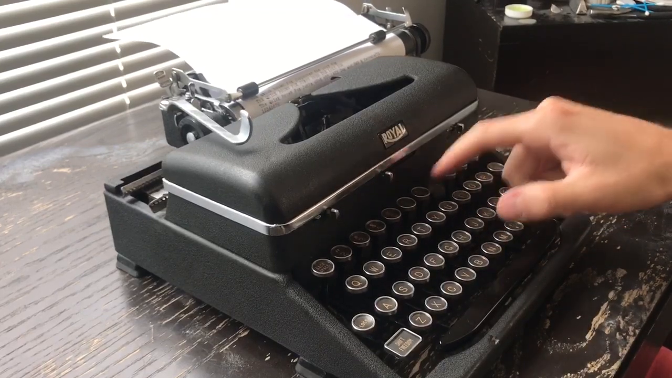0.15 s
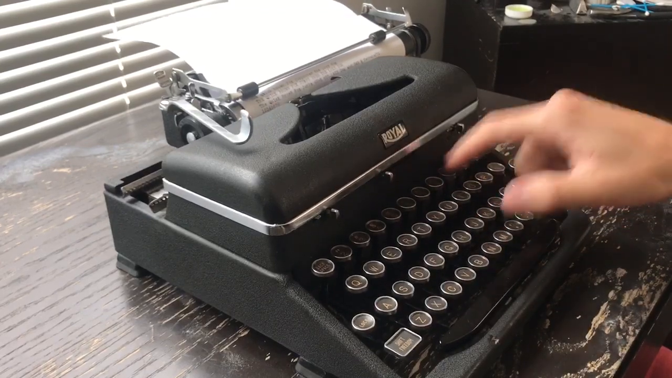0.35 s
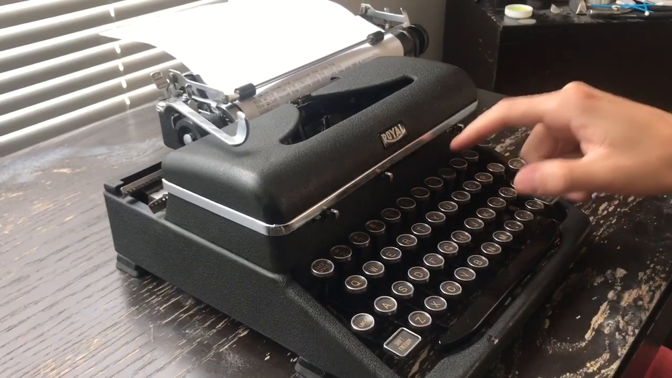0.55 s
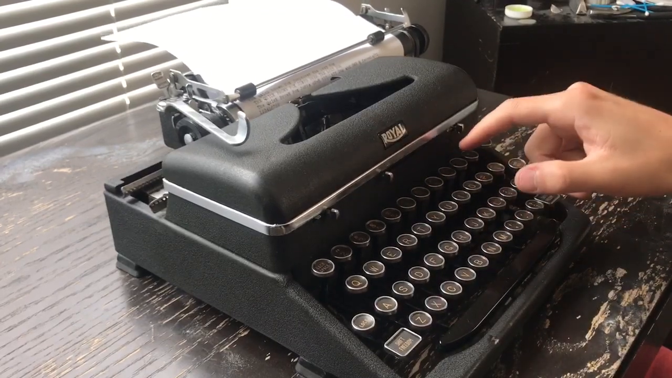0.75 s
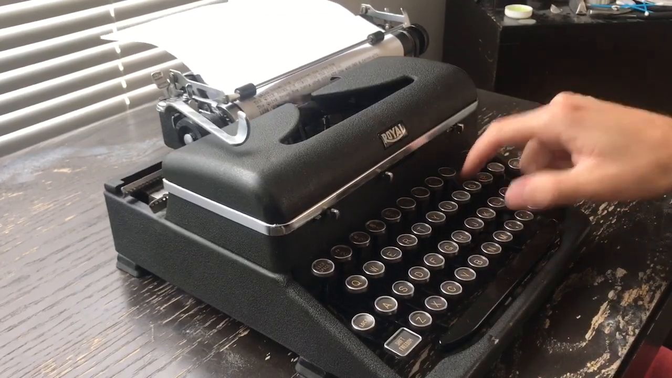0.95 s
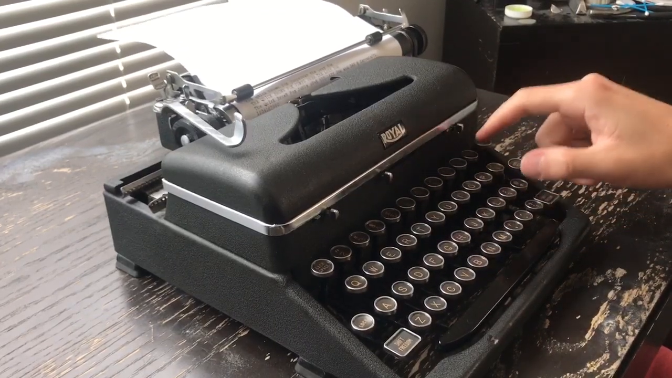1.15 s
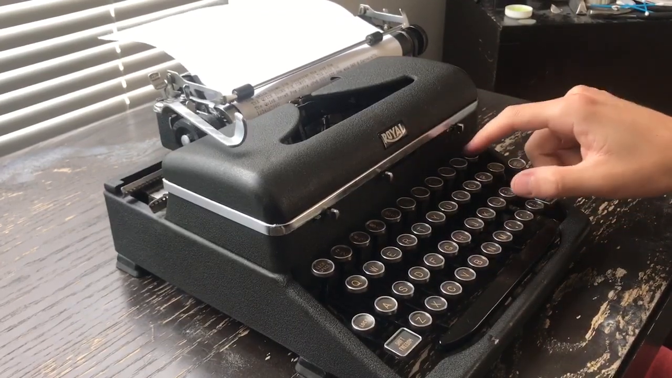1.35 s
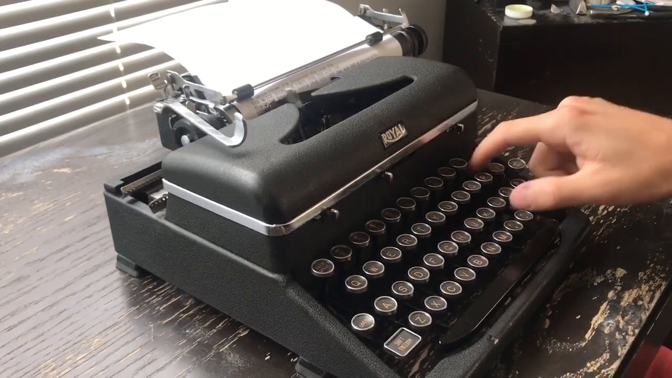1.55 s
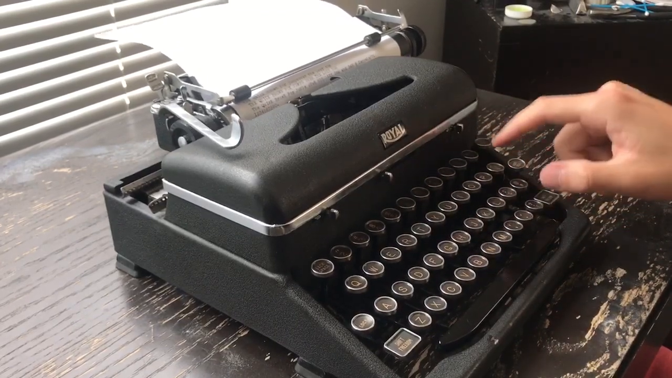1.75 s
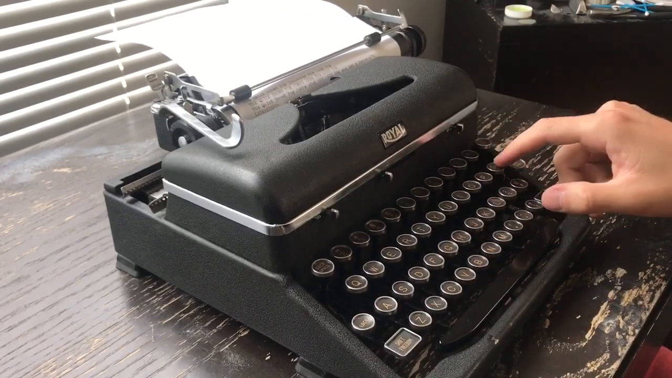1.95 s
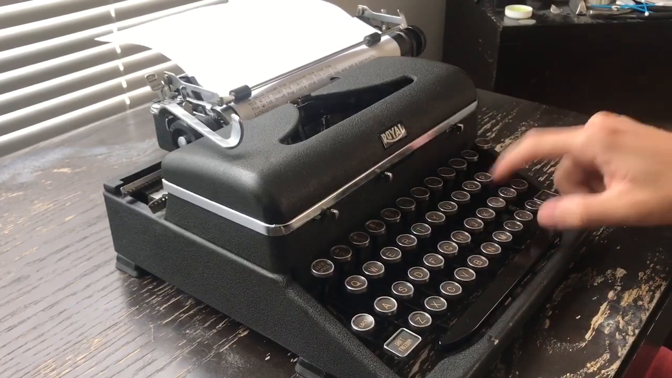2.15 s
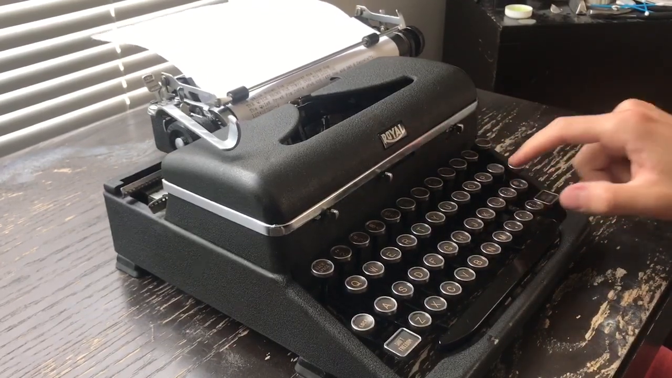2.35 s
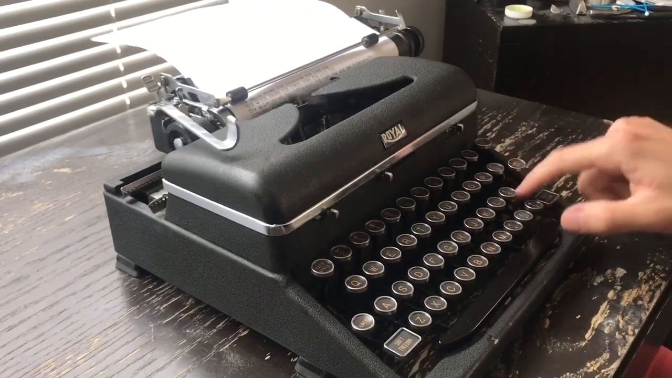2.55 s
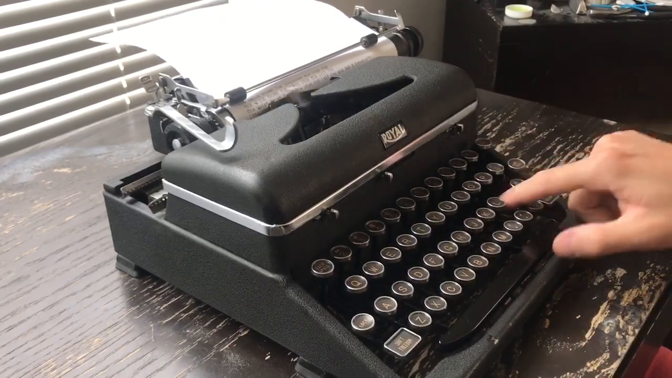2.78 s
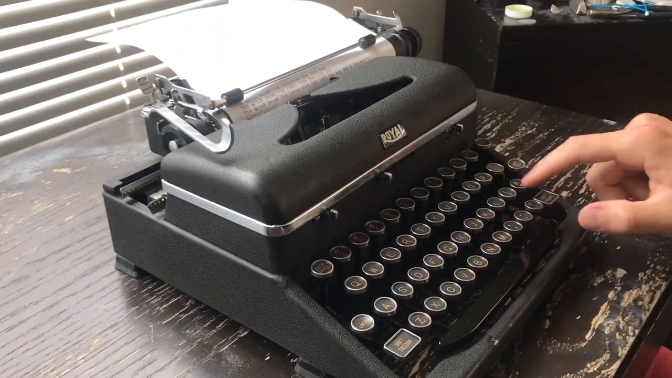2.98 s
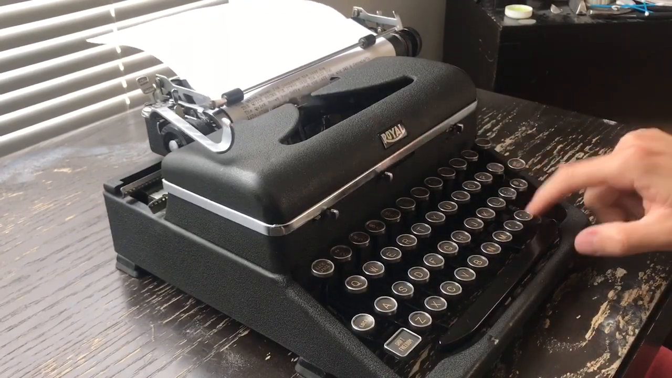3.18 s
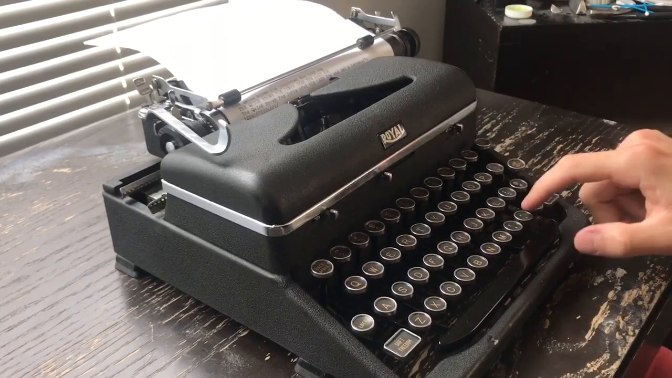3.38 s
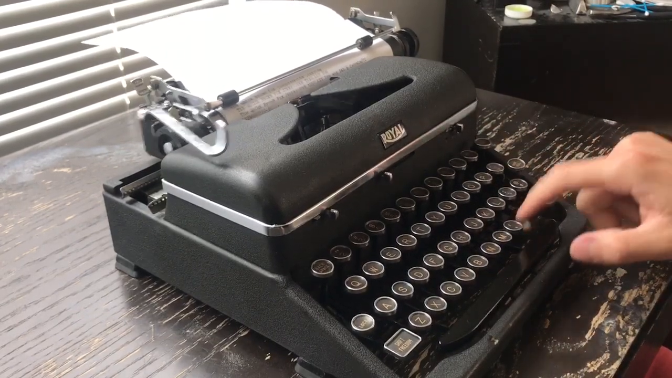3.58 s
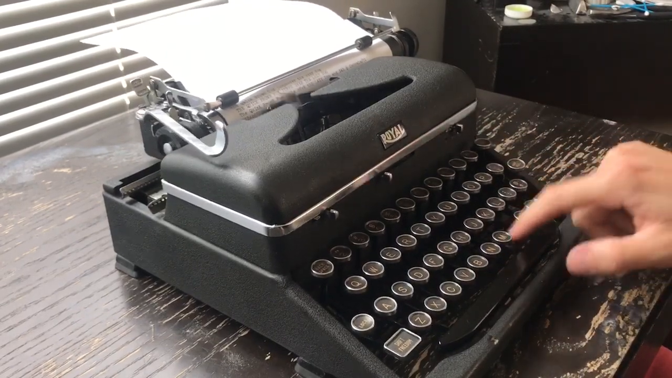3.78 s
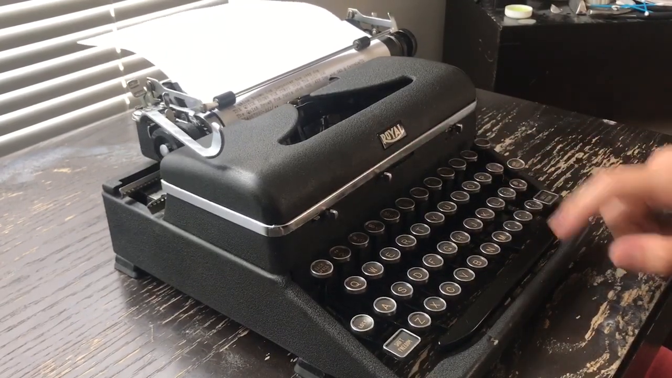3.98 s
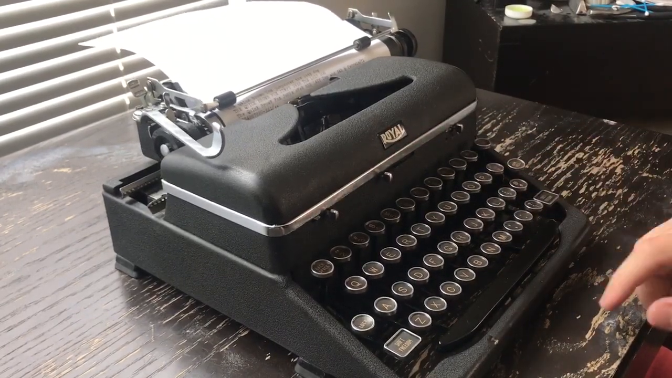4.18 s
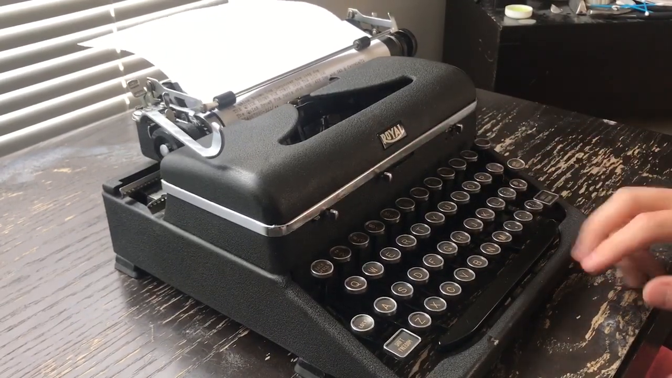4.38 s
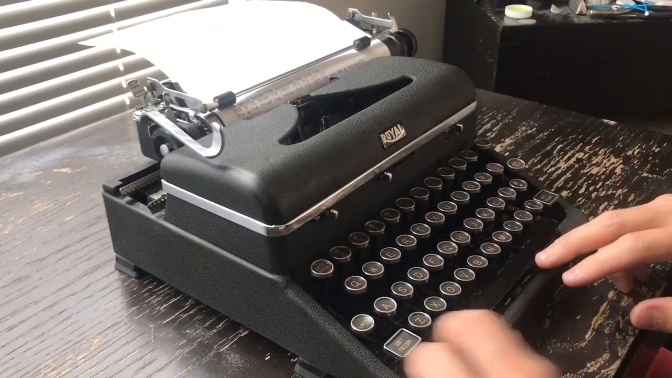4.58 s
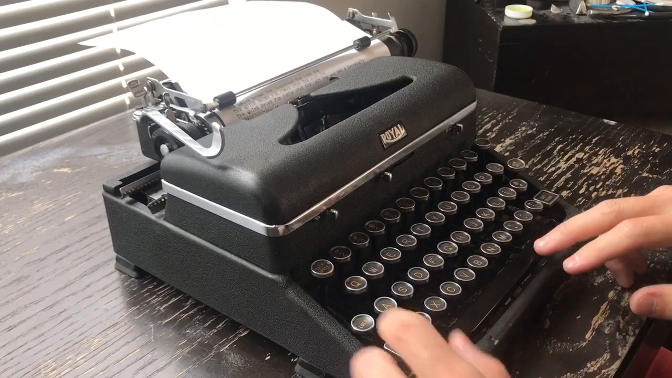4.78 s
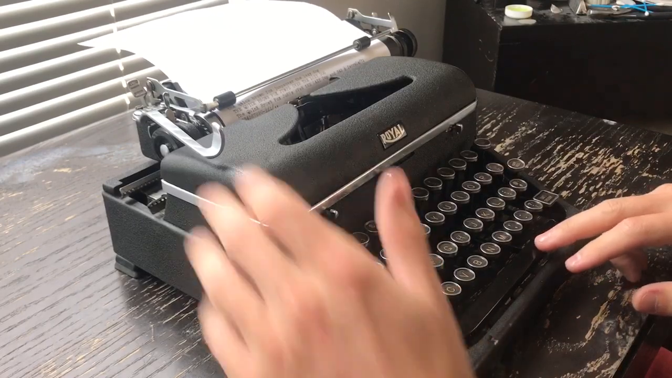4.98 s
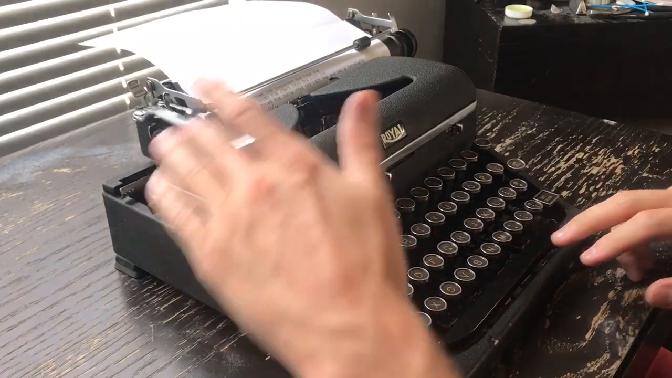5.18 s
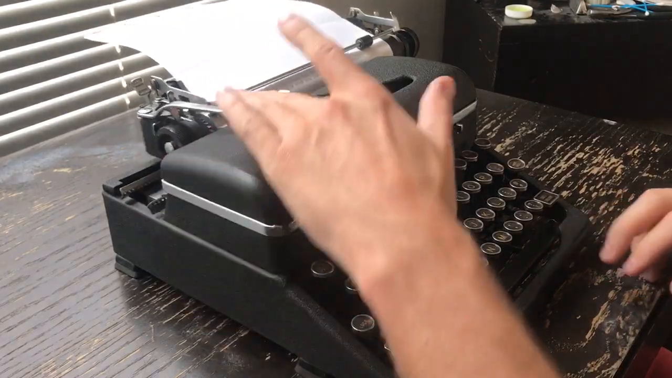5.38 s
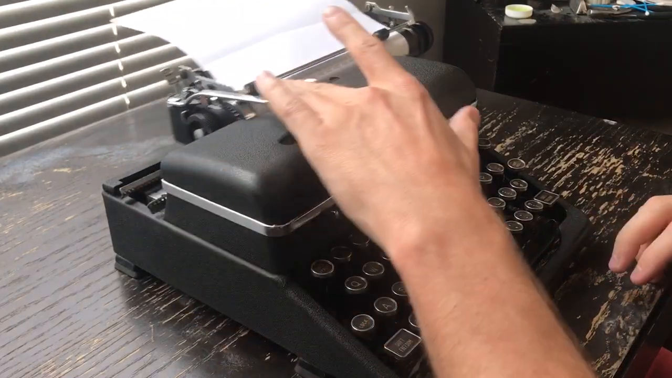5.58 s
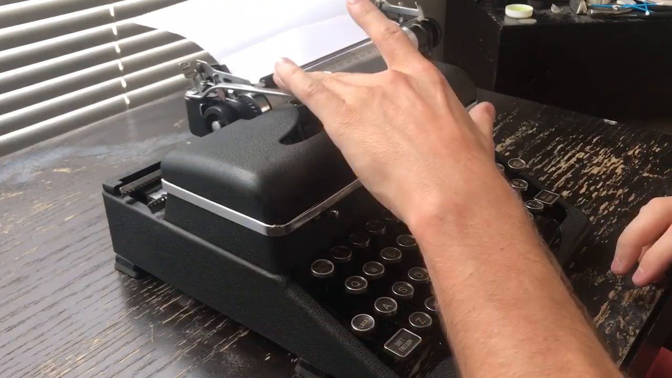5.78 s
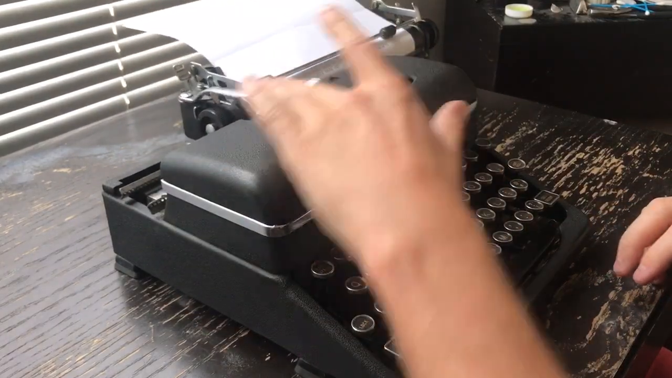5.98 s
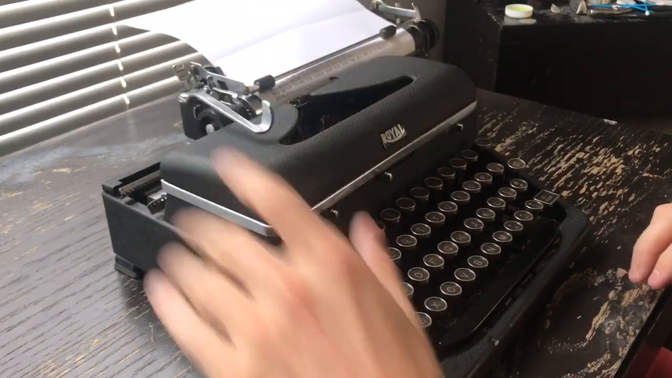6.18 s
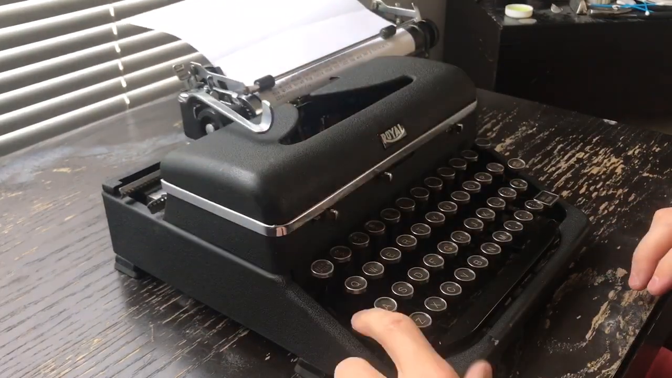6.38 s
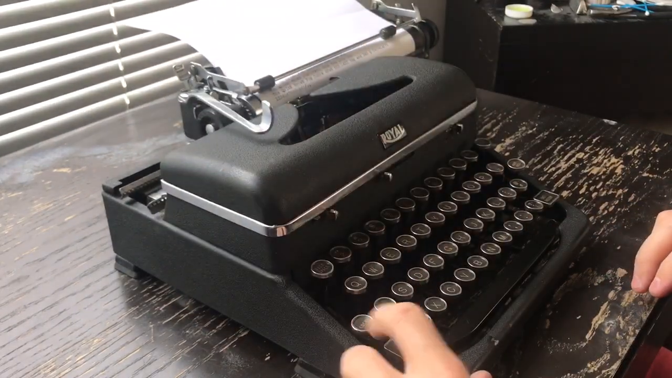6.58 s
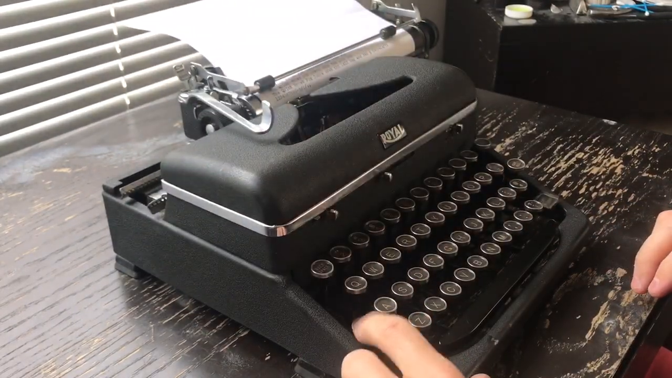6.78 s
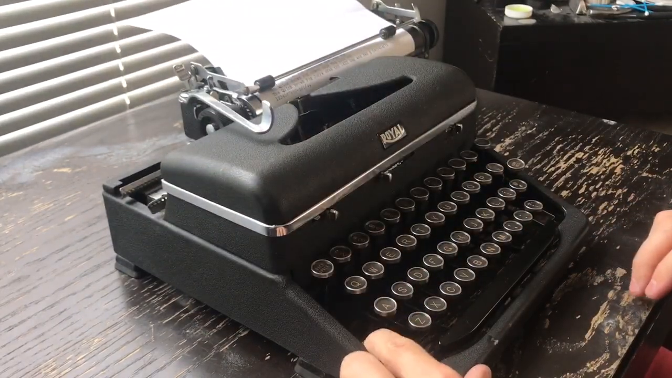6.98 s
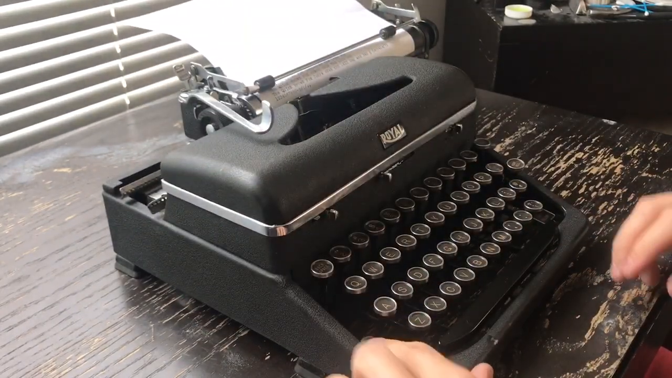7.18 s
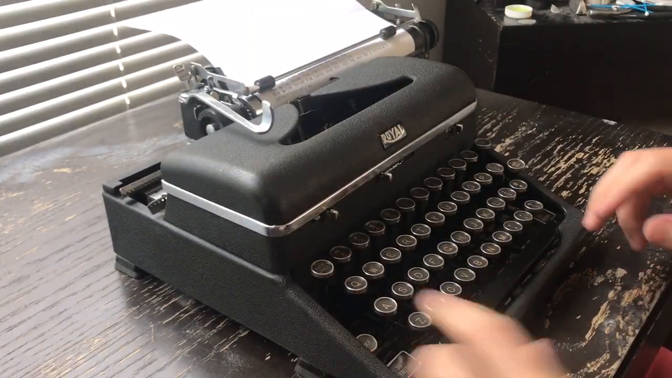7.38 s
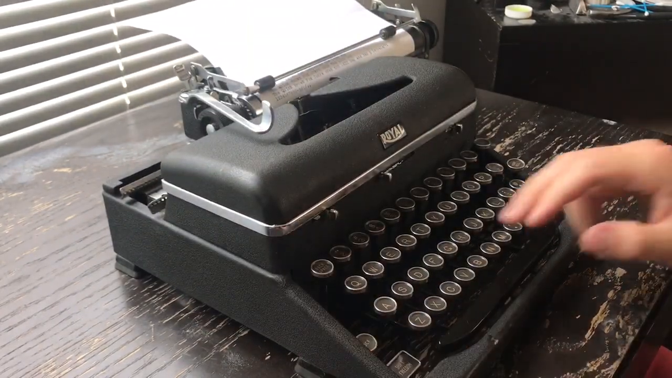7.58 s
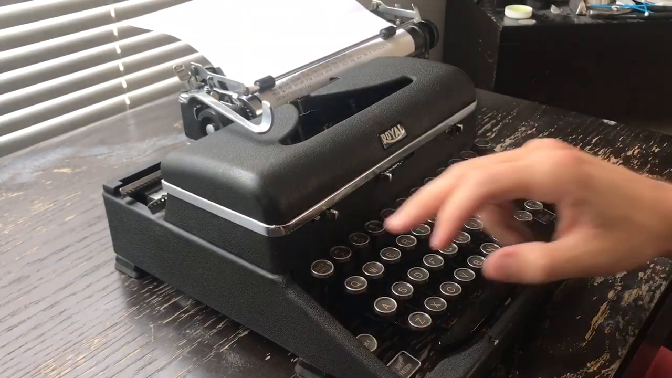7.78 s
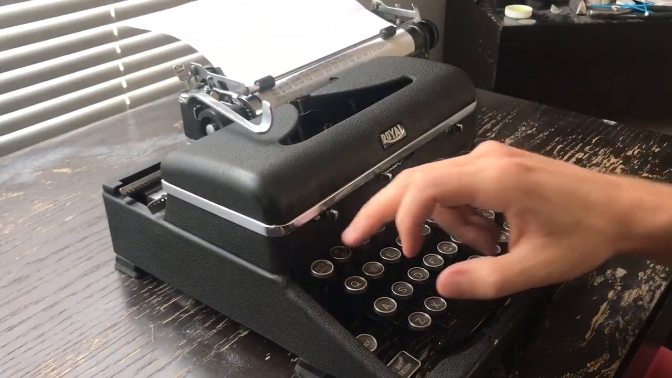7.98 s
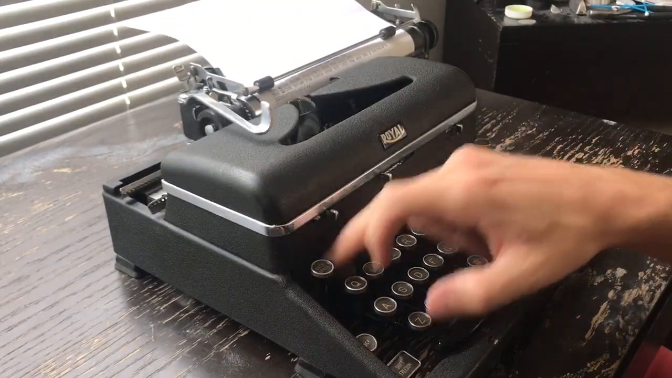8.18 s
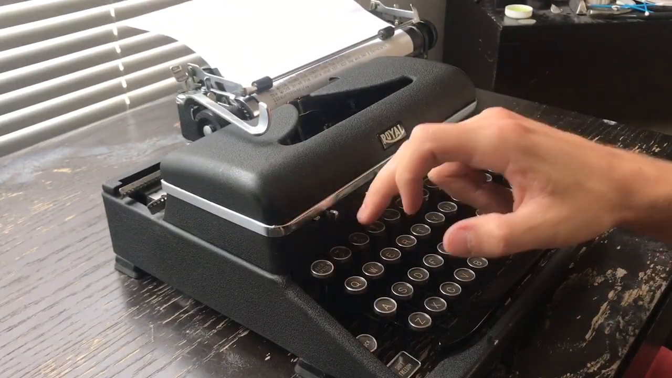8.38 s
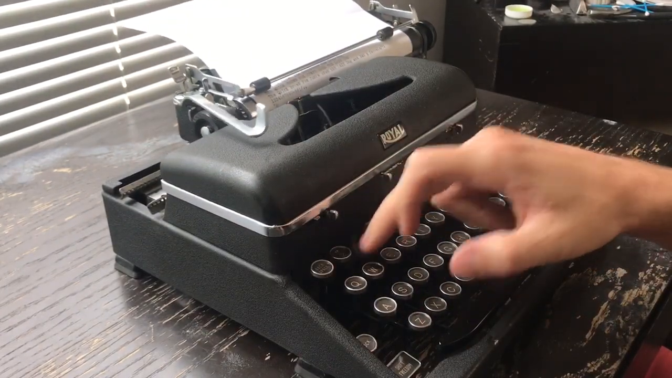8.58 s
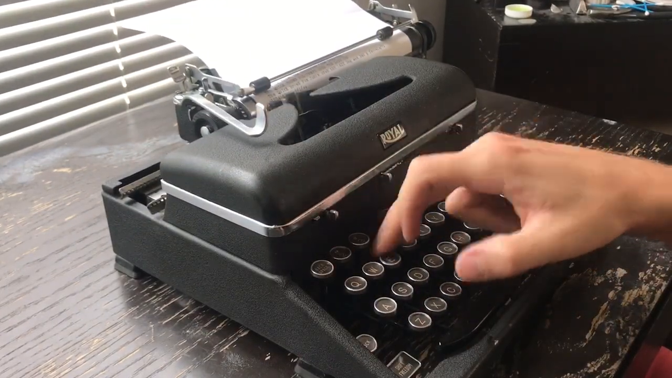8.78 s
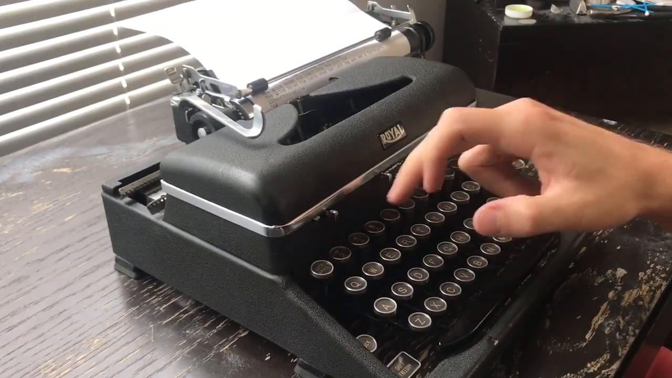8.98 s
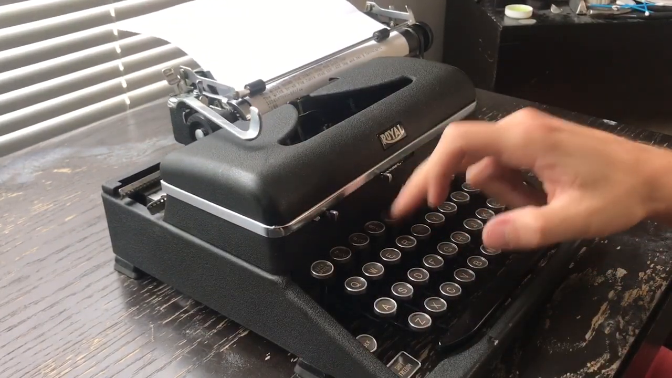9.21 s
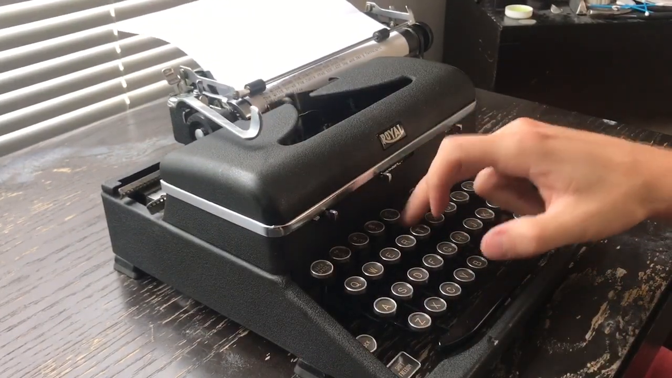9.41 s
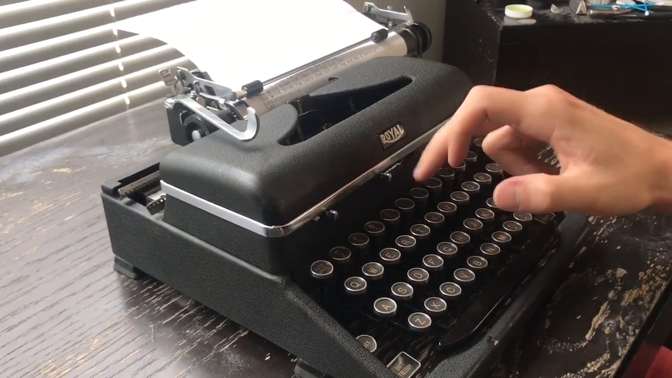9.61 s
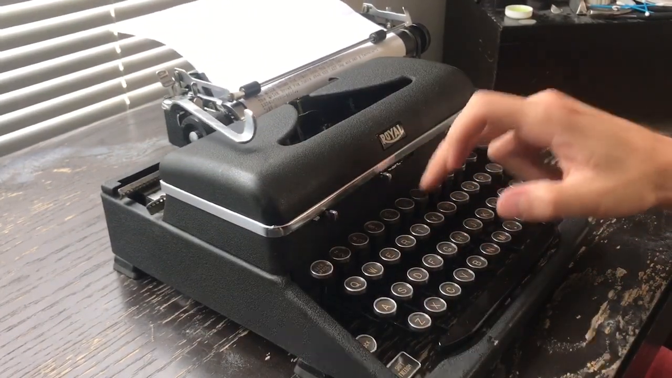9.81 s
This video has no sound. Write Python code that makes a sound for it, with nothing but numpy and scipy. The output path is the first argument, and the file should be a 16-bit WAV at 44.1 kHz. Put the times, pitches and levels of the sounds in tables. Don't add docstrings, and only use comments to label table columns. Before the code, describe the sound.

Close view of a manual typewriter on a wooden desk in a small quiet room. Ten sharp metallic clacks come at an uneven, unhurried pace, each with a light click before and a softer clunk after. A pause, then the lever clicks and the carriage zips back over its ratchet and thuds to a stop. After a shift clunk, six more strokes follow, the first weaker. Faint hiss and low room rumble lie underneath.

```python
import sys
import numpy as np
from scipy import signal
from scipy.fft import rfft, irfft
from scipy.io import wavfile
from scipy.ndimage import uniform_filter1d

SR = 44100
rng = np.random.default_rng(int(sys.argv[2]) if len(sys.argv) > 2 else 0)


def amplitude_ratio(level_db):
    exponent = np.asarray(level_db, float) / 20
    return 10 ** exponent


def generate_wav(signal):
    frames = np.transpose(np.atleast_2d(signal))
    scaled = np.clip(frames, -1, 1) * 32767
    pcm = np.round(scaled).astype(np.int16)
    wavfile.write(sys.argv[1], SR, pcm)


N = 434385
TIME = np.arange(N) / SR

# frequency_hz, density_db
RUMBLE = [(18, -42.5), (30, -17), (46, -8), (59, -1.5), (70, -6), (157, -11), (186, -24), (250, -59.5)]
# frequency_hz, density_db
DUCT = [(170, -30), (205, 0.5), (302, -7), (335, -1), (427, -14.5), (1400, -18.5), (1800, -30), (4180, -70)]
# frequency_hz, density_db
SELF_NOISE = [(300, 5), (1700, 9), (3000, 7.5), (4300, 4.5), (6000, 3), (9500, 0.5), (15500, -0.5)]
# start_s, end_s
LOUD_RANGE = [
    (0, .908),
    (.985, 1.395),
    (2.266, 4.227),
    (8.2, 8.62),
    (8.88, 9.85),
]
# frequency_hz, width_hz, share_removed
PORT_NOTCH = (10600, 730, 0.27)

# frequency_hz, width_hz, level_db
LEG_MODES = [(55, 16, -8), (63.3, 13, -7.5)]
# frequency_hz, width_hz, level_db
TOP_MODES = [(107, 31, -3), (117, 14, -0.5), (154.2, 17, 1.5)]
# frequency_hz, width_hz, level_db
DESK_MODES = [(207.3, 9, 4), (268.6, 9.5, -1.5), (294.8, 7.2, -2.5), (366, 14, -9.5)]
# frequency_hz, width_hz, level_db
SHELL_MODES = [(559, 42, 1.5), (695, 70, -1), (975, 290, -0.5), (1440, 510, -4), (1690, 410, -7)]
# frequency_hz, width_hz, level_db
STEEL_MODES = [(2060, 91, 1), (2340, 79, -6), (2546, 170, 1), (2876, 210, 4)]
# frequency_hz, width_hz, level_db
BAR_MODES = [(3750, 430, 2), (4130, 330, -1), (5520, 290, -1.5), (6290, 420, -13)]
# frequency_hz, width_hz, level_db
TICK_MODES = [(8640, 1600, 2), (9490, 830, 1.5), (11770, 3200, 6.5), (14800, 2500, -15.5)]
# frequency_hz, width_hz, level_db
RACK_MODES = [(920, 50, -4), (1250, 40, -8), (1440, 45, -6), (2010, 120, -2), (2360, 140, 0),
              (2960, 160, 1), (3400, 150, -3), (3970, 250, 2.5), (4380, 90, -2), (5080, 180, -5),
              (5650, 100, -6)]
# frequency_hz, width_hz, level_db
PAWL_MODES = [(8500, 120, 3), (10100, 88, -6), (11000, 110, -6), (12200, 270, -10), (13700, 180, -11),
              (15300, 94, -5)]
# frequency_hz, level_below_blow_db, t60_s
FRAME_RINGS = [(540, -24, .15), (974, -26, .15), (2040, -22, .18), (2516, -22, .15), (2587, -20, .25),
               (2934, -19.5, .28), (3110, -24, .2), (3436, -24, .2), (3772, -23, .2), (4360, -25, .15),
               (4855, -26, .15), (5537, -26, .12)]

# start_s, level_db
BRUSHES = [(7.85, -69), (7.91, -67), (5.325, -61), (5.36, -58), (4.27, -74), (7.22, -73)]
# start_s, top_db
PRESS_THUMPS = [(.159, -43.5), (.516, -40.5), (1.015, -41), (1.655, -44), (2.271, -46.5), (2.291, -48),
                (2.604, -39.5), (2.865, -42.5), (3.18, -46.5), (3.583, -42.5), (3.859, -45), (8.606, -50),
                (8.872, -47.5), (9.201, -42), (9.488, -45.5), (9.7, -56), (9.779, -49.5)]
# start_s, legs_db
RETURN_THUMPS = [(.002, -48), (0.286, -45.5), (.652, -46), (1.132, -45.5), (1.75, -45), (2.435, -44),
                 (2.683, -43.5), (2.944, -43.5), (3.356, -47), (3.735, -44), (3.945, -45), (8.308, -44.5),
                 (8.688, -48), (8.987, -45), (9.312, -46), (9.606, -46)]
# start_s, legs_db, top_db
HEAVY_THUMPS = [
    (5.81, -59.5, -51.5),
    (5.999, -57, -65),
    (6.05, -45.5, -44),
    (6.1, -45, -55),
    (7.0, -42.5, -43),
    (7.054, -46, -60),
]
# time_s, speed_teeth_per_s
CARRIAGE = [
    (5.4917, 35.97),
    (5.541, 40.4),
    (5.612, 63.65),
    (5.664, 71.6),
    (5.8, 50.83),
]

# start_s, steel_db, tick_rel_steel_db
SLACK = [(.1019, -46.5, 1), (.461, -46, -1), (.9489, -46.5, -4), (1.589, -48.5, 5), (2.2296, -49, 2.5),
         (2.5613, -47, 2.5), (2.825, -46.5, 0.5), (3.1718, -49.5, 1), (3.5465, -51, -4.5), (3.792, -46, -1),
         (8.1583, -50, 3), (8.5497, -45, 4), (8.8437, -51, 3), (9.1725, -44.5, 4), (9.4664, -45, 2),
         (9.7653, -47.5, 4)]
# start_s, steel_db, tick_rel_steel_db
GUIDE = [(.125, -36, -0.5), (.48, -37, -6), (.97, -34.5, -13.5), (1.6163, -37, -4.5), (2.2547, -37, -8),
         (2.5792, -42, -6), (2.8467, -42.5, -12), (3.1908, -41.5, -14), (3.5653, -39.5, -14.5),
         (3.8068, -42, -18.5), (8.194, -39, -2.5), (8.578, -38, -8), (8.867, -39, -5.5),
         (9.199, -36.5, -6.5), (9.4945, -38.5, -6), (9.786, -41.5, -13)]
# start_s, steel_db, tick_rel_steel_db
ESCAPE = [(.2361, -48.5, 2), (.5952, -44, -6), (2.382, -49.5, -3), (3.305, -52, 4), (3.683, -55.5, 2.5),
          (8.2862, -46, -5), (8.6675, -46.5, -1.5), (9.5876, -46.5, 2.5)]
# start_s, steel_db, tick_rel_steel_db
FALL = [(.2467, -39, -5), (.6114, -35.5, -11), (1.0949, -39, -6), (1.7104, -37.5, -5.5),
        (2.3957, -38.5, -7), (2.6716, -38, -10), (2.9234, -37.5, -18), (3.3173, -37.5, -10),
        (3.6938, -38, -9), (3.9368, -37.5, -11), (8.3051, -37, -11.5), (8.6903, -37, -5.5),
        (8.9833, -37.5, -5.5), (9.3082, -38.5, -6), (9.6015, -38, -10)]
# start_s, steel_db, tick_rel_steel_db
STOP = [(.274, -47.5, 3), (0.6305, -46, 2), (1.1075, -41, -2.5), (1.7538, -49, 1.5), (2.4478, -52.5, 3.5),
        (2.7205, -49.5, 6), (2.9893, -49, 5.5), (3.3543, -49.5, 5), (3.7236, -48.5, 0), (3.9655, -48.5, -6),
        (8.3328, -47, -0.5), (8.7102, -47, -3), (9.002, -45.5, 1), (9.3265, -46, 2.5),
        (9.6156, -44.5, -4.5)]
# start_s, steel_db, tick_rel_steel_db
SETTLE = [(.004, -55, -2.5), (2.5142, -62, -6.5), (2.738, -55, -5), (3.0417, -59.5, -1.5), (3.368, -57, 6),
          (3.738, -55.5, 3), (8.768, -62, 5), (9.0537, -56, -4), (9.6662, -58, 2)]
# rows, shell_rel_steel_db, desk_db, share_of_strength_reaching_desk
STAGES = [
    (SLACK, -2, -51, .3),
    (GUIDE, -4.5, -36.5, .6),
    (ESCAPE, -2, -48, .6),
    (FALL, -0.8, -43.5, .4),
    (STOP, 4.2, -46, .1),
    (SETTLE, -1.5, -47.5, .6),
]
# start_s, steel_db, then relative to it tick_db, shell_db, desk_db
LEVERS = [(4.3874, -66, -12, 4.5, 4), (5.3029, -60, -2.5, -11.5, -1), (5.3263, -57.5, -1, -4, 2),
          (5.336, -62, -10, 2, 7.5), (5.357, -58, -12.5, 3, 8), (5.3908, -42, -5, -6, -14),
          (5.405, -56, -5.5, 0, 1), (5.4698, -60, -5, -1, 5), (5.807, -44.5, -6, 4, -5),
          (5.8148, -44.5, -14.5, -1.5, -8), (5.823, -54, -18.5, -3, -5.5), (6.0138, -49, -6.5, -4, -13),
          (6.0316, -48.5, -5, -4, 1), (6.0395, -46, -13, 1, -3), (6.0401, -39, -13, -1, -4.5),
          (6.046, -48, -12, -1, -7), (6.099, -44.5, 2, -7, -8), (6.1593, -51, -6, 2, 1),
          (6.881, -61, -11.5, 4, 6.5), (6.897, -46, -2.5, -3.5, -3), (6.9961, -40, -1, -3.5, 1.5),
          (7.0864, -62.5, -5.5, 6.5, 12), (7.3392, -48, 0.5, -1.5, -1.5), (7.8395, -72.5, -5.5, 6, 14)]

# start_s, level_db, pitch_hz
PINGS = [(.4855, -43, 6330), (3.187, -45, 6400), (6.015, -39, 3750), (6.1, -37, 12500), (.4972, -17, 4480),
         (3.355, -42, 5200), (3.2042, -15, 4190), (8.709, -38, 2050), (8.681, -40, 2850),
         (8.579, -35, 2700), (3.566, -36, 2800), (2.2555, -35, 2500), (6.9985, -28, 8200),
         (6.898, -39, 8250), (6.898, -42, 4200), (5.8135, -34, 1670), (5.808, -37, 1300), (8.601, -30, 800),
         (8.608, -33, 950), (7.3395, -34, 1570), (8.714, -36, 560)]
# start_s, level_db, pitch_hz
LEVER_NOTES = [(5.3907, -43, 2570), (5.3923, -48, 950), (5.3918, -43, 2200), (5.3942, -44, 6730),
               (5.8155, -40, 1400), (5.8161, -43, 1130), (5.8143, -38, 2930), (5.8194, -49, 660),
               (6.0402, -38, 930), (6.0406, -45, 570), (6.0455, -42, 1420), (6.0427, -37, 2930),
               (6.0993, -45, 2480), (6.0998, -47, 2780), (6.1021, -50, 1600), (6.1018, -46, 4450),
               (6.1589, -48, 710), (6.1611, -50, 990), (6.1634, -52, 2490), (6.1648, -57, 1400),
               (6.898, -47, 1220), (6.8973, -46, 2450), (6.8996, -52, 610), (6.8973, -42, 5810),
               (7.0016, -44, 1170), (6.9982, -36, 2650), (6.9998, -41, 1510), (6.9974, -38, 4250),
               (7.3427, -46, 1590), (7.3425, -46, 1910), (7.3385, -45, 2860), (7.3397, -50, 1150)]
# start_s, level_db, pitch_hz
REST_NOTES = [(0.2482, -38, 2760), (0.2476, -39, 3320), (0.6111, -35, 2780), (0.6106, -41, 2210),
              (1.0941, -37, 2780), (1.0939, -42, 2380), (1.7107, -36, 2940), (1.7118, -39, 3930),
              (2.395, -36, 2790), (2.3949, -36, 3520), (2.6733, -37, 2970), (2.6736, -40, 2070),
              (2.925, -36, 2840), (2.9207, -47, 1870), (3.3175, -36, 2830), (3.3168, -38, 2200),
              (3.6958, -35, 3120), (3.696, -37, 2500), (3.9391, -38, 2790), (3.9382, -41, 2000),
              (8.3069, -35, 2930), (8.3069, -37, 2560), (8.6913, -34, 2930), (8.6946, -47, 2010),
              (8.9854, -37, 2940), (8.9845, -39, 2340), (9.3102, -37, 2620), (9.3113, -40, 2970),
              (9.602, -34, 2960), (9.6021, -40, 2160), (0.2496, -38, 1440), (0.6078, -40, 900),
              (1.1078, -37, 1020), (1.7087, -45, 850), (2.3962, -40, 1450), (2.6701, -42, 930),
              (2.9314, -41, 970), (3.3221, -39, 1390), (3.6931, -44, 1040), (3.935, -41, 920),
              (8.3022, -43, 1050), (8.6889, -37, 950), (8.982, -43, 870), (9.3069, -39, 930),
              (9.6154, -43, 560)]
# start_s, level_db, pitch_hz
COVER_NOTES = [(0.1399, -36, 850), (0.4951, -39, 540), (0.9845, -33, 1000), (1.6329, -38, 1000),
               (2.2664, -32, 1460), (2.5997, -35, 820), (2.8635, -35, 920), (3.2059, -38, 670),
               (3.5813, -35, 700), (3.8192, -32, 1510), (8.2094, -33, 740), (8.5939, -37, 820),
               (8.8825, -36, 990), (9.2124, -36, 820), (9.5178, -41, 820), (9.8094, -34, 1380)]
# start_s, level_db, pitch_hz
BAR_NOTES = [(0.1377, -21, 2580), (0.1394, -25, 3090), (0.1383, -20, 4840), (0.4967, -22, 2870),
             (0.4967, -21, 2580), (0.4972, -23, 3810), (0.9837, -20, 2880), (0.9838, -20, 2500),
             (0.9846, -18, 4320), (1.6275, -23, 2610), (1.628, -24, 3780), (1.6277, -29, 1950),
             (2.2652, -18, 2630), (2.2682, -21, 2940), (2.266, -21, 3780), (2.5951, -19, 2600),
             (2.5949, -27, 2060), (2.5951, -21, 2960), (2.8597, -21, 2620), (2.8598, -20, 2970),
             (2.8604, -21, 3700), (3.2034, -18, 2610), (3.2037, -19, 2960), (3.2037, -23, 2050),
             (3.5798, -21, 2960), (3.5796, -23, 2400), (3.5801, -26, 2050), (3.8173, -18, 2940),
             (3.8173, -23, 2480), (3.8178, -21, 3670), (8.21, -33, 3080), (8.2067, -29, 4540),
             (8.2091, -34, 2790), (8.5927, -23, 5940), (8.5899, -22, 4230), (8.5901, -22, 4540),
             (8.8814, -17, 4540), (8.8812, -18, 4210), (8.881, -24, 2860), (9.2096, -16, 4360),
             (9.2094, -17, 4730), (9.2094, -22, 2910), (9.5071, -20, 4180), (9.5062, -24, 2610),
             (9.5067, -28, 2050), (9.803, -20, 4690), (9.8029, -18, 4360), (9.8026, -24, 2910)]
# start_s, steel_db, then relative to it tick_db, shell_db
STRIKES = [(0.139, -22.5, -4.5, -13.5), (0.4972, -23.5, -4, -15.5), (0.9845, -23, -3.5, -10),
           (1.629, -25, -2.5, -8.5), (2.2662, -20.5, -4.5, -14), (2.596, -22.5, -4.5, -10),
           (2.8605, -24, -5.5, -9), (3.2041, -23, -2, -13), (3.581, -24, -3, -9.5),
           (3.8175, -21.5, 1.5, -9), (8.2068, -32.5, .5, -3.5), (8.59, -29, 2, -8), (8.881, -24, 2, -11.5),
           (9.21, -23, 1.5, -11.5), (9.5072, -25.5, -6, -10.5), (9.803, -24.5, -1.5, -10)]

BOUNCE_S = 0.013


def coloured(spectrum, db):
    hz, shape_db = np.transpose(spectrum)
    log_hz = np.log(np.fft.rfftfreq(N, 1 / SR) + 1)
    gain = amplitude_ratio(np.interp(log_hz, np.log(hz), shape_db))
    x = irfft(rfft(rng.standard_normal(N)) * gain, N)
    return x * amplitude_ratio(db) / np.std(x)


def air():
    return coloured(RUMBLE, -57.5) + coloured(DUCT, -64.5)


def room(x):
    level_db, t60_low_s, t60_high_s = -7, 0.38, 0.3
    t = TIME[:SR // 2]
    noise = rng.standard_normal(len(t)) * np.minimum(t / 0.0081, 1)
    low = signal.sosfilt(signal.butter(1, 2500, fs=SR, output="sos"), noise)
    tail = low * amplitude_ratio(-60 * t / t60_low_s) + (noise - low) * amplitude_ratio(-60 * t / t60_high_s)
    tail = tail / np.sqrt(np.sum(tail ** 2))
    wet = amplitude_ratio(level_db) * signal.fftconvolve(x, tail)[:N]
    bass = signal.sosfiltfilt(signal.butter(2, 1200, fs=SR, output="sos"), wet)
    buzz = np.sign(uniform_filter1d(rng.standard_normal(N), size=60))
    return bass + (wet - bass) * uniform_filter1d(buzz, size=12)


def rattle(times, db, t60, rise, grit_db):
    power = np.zeros(N)
    np.add.at(power, np.minimum((times * SR).astype(int), N - 1), amplitude_ratio(db) ** 2)
    fall = np.exp(-2 * np.log(1000) / (t60 * SR))
    swell = np.exp(-1 / (rise * SR))
    power = signal.lfilter([1 - swell], np.poly([fall, fall * swell]), power)
    grit = amplitude_ratio(grit_db * np.repeat(rng.standard_normal(N // 32 + 1), 32)[:N])
    return np.sqrt(np.abs(power) / np.mean(grit ** 2)) * grit * rng.standard_normal(N)


def pushes(times, db):
    out = np.zeros(N)
    sign = np.sign(rng.standard_normal(len(times)))
    np.add.at(out, (times * SR).astype(int), sign * amplitude_ratio(db))
    return out


def body(x, modes, broad_db, lo_hz, hi_hz):
    most_q = 22
    band = signal.butter(3, [lo_hz, min(hi_hz, SR / 2.2)], "bandpass", fs=SR, output="sos")

    def ring(v):
        total = amplitude_ratio(broad_db) * v
        for hz, width, db in modes:
            b, a = signal.iirpeak(hz, min(hz / width, most_q), SR)
            total = total + amplitude_ratio(db) * signal.lfilter(b, a, v)
        return signal.sosfilt(band, total)

    return ring(x) / np.sqrt(np.sum(ring(signal.unit_impulse(SR // 4)) ** 2))


def brushes():
    s, db = np.transpose(BRUSHES)
    band = signal.butter(1, [900, 9000], "bandpass", fs=SR, output="sos")
    return signal.sosfilt(band, rattle(s, db + 7, 0.22, 0.02, 2.5))


def thumps():
    press_legs_db, return_top_db = -54, -51
    rows = [(s, press_legs_db, db) for s, db in PRESS_THUMPS]
    rows += [(s, db, return_top_db) for s, db in RETURN_THUMPS]
    s, legs_db, top_db = np.transpose(rows + HEAVY_THUMPS)
    legs = body(pushes(s, legs_db + 32.5), LEG_MODES, -29, 43, 84)
    top = body(pushes(s, top_db + 34.5), TOP_MODES, -31, 85, 180)
    return legs + top


def base():
    hum_hz, t60_s, level_db = 207.3, 0.32, -37.5
    t, kicks = TIME[:SR // 2], np.zeros(N)
    at = (np.array(STOP)[:, 0] * SR).astype(int)
    kicks[at] = amplitude_ratio(level_db + 2.2 * rng.standard_normal(len(STOP)))
    hum = amplitude_ratio(-60 * t / t60_s) * (1 - np.exp(-t / 0.0067)) * np.sin(2 * np.pi * hum_hz * t)
    return signal.fftconvolve(kicks, hum)[:N]


def teeth():
    tooth_db, scatter_db, brighter_db = -45.5, 1.9, 0.13
    at, speed = np.transpose(CARRIAGE)
    t = TIME[(TIME >= at[0]) & (TIME < at[-1])]
    passed = np.cumsum(np.interp(t, at, speed)) / SR
    s = np.interp(np.arange(int(passed[-1]) + 1), passed, t)
    steel, bright = scatter_db * rng.standard_normal((len(s), 2)).T
    tick = brighter_db * (np.interp(s, at, speed) - 48) + bright - steel
    return s, tooth_db + steel, tick


def ratchet():
    s, steel, tick = teeth()
    span = (TIME > s[0] - 0.01) & (TIME < s[-1] + 0.3)
    kicks = np.zeros(N)
    kicks[(s * SR).astype(int)] = amplitude_ratio(steel + 3)
    t = TIME[:SR // 50]
    burst = rng.standard_normal(len(t)) * amplitude_ratio(-60 * t / 0.018) * np.minimum(t / 0.0015, 1)
    alike = signal.fftconvolve(kicks[span], burst, "full")[:span.sum()]
    chatter = rattle(s, steel + 4, 0.022, 0.0013, 1.5)[span]
    bright = rattle(s, steel + tick + 6, 0.024, 0.0011, 1.5)[span]
    rollers = rattle(s, steel - 10, 0.15, 0.003, 1.5)[span]
    out = np.zeros(N)
    out[span] += body(alike + chatter, RACK_MODES, -7, 800, 5200)
    out[span] += body(bright, PAWL_MODES, 2, 5700, 15000)
    out[span] += body(rollers, RACK_MODES[:3], -6, 600, 2300)
    out[span] += body(rollers, RACK_MODES[3:], -4, 1900, 7700) * amplitude_ratio(-3)
    return out


def stroke_contacts():
    rows = []
    for stage, shell, desk_db, share in STAGES:
        usual = np.mean([steel for _, steel, _ in stage])
        for s, steel, tick in stage:
            rows.append((s, steel, tick, shell, desk_db + share * (steel - usual) - steel))
    return rows


def contacts(rows, rise, t60):
    s, steel, tick, shell, desk = np.transpose(rows)
    return np.array([
        rattle(s, steel + 1.5, t60, rise, 1),
        rattle(s, steel + 0.5 * tick + 0.3, t60, rise, 3),
        rattle(s, steel + tick + 1.9, 0.98 * t60, 0.71 * rise, 5.4),
        rattle(s, steel + shell + 2.8, 2.0 * t60, 2.1 * rise, 2.3),
        pushes(s + 0.003, steel + desk + 24) + rattle(s, steel + desk - 8, 0.22, 0.0031, 5.2)])


def linkage():
    rows = stroke_contacts() + LEVERS
    crisp = [row for row in rows if row[2] > -5]
    felt = [(row[0] - 0.001, *row[1:]) for row in rows if row[2] <= -5]
    drives = contacts(crisp, 0.00085, 0.04) + contacts(felt, 0.0025, 0.046) * amplitude_ratio(-0.6)
    s, steel, _ = np.transpose(FALL)
    clack = ((s + 0.0028) * SR).astype(int)
    drives[0, clack] += amplitude_ratio(steel + 13)
    drives[1, clack] += amplitude_ratio(steel + 8)
    drives[3, clack] += amplitude_ratio(steel + 17)
    return drives


def ringing():
    out, t = np.zeros(N + SR), TIME[:SR // 20]
    bounces = [(s + BOUNCE_S, steel - 3, 5200) for s, steel, *_ in STRIKES]
    # notes, lift_db, decay_cycles
    groups = [(BAR_NOTES, 5.5, 5), (COVER_NOTES, 3.5, 22), (REST_NOTES, 4, 14),
              (LEVER_NOTES, 4, 16), (bounces, 0.1, 7), (PINGS, 0.1, 7)]
    for notes, lift_db, cycles in groups:
        for (s, db, hz), turn in zip(notes, rng.random(len(notes))):
            i = int((s + 1.5 / hz) * SR)
            decay = amplitude_ratio(db + lift_db - 60 * t / (0.0086 + cycles / hz))
            onset = 1 - np.exp(-t / 0.00041)
            out[i:i + len(t)] += decay * onset * np.sin(2 * np.pi * (hz * t + turn))
    return out[:N]


def frame():
    out, t = np.zeros(N + SR), TIME[:SR // 5]
    hz, db, t60 = np.transpose(FRAME_RINGS)[:, :, None]
    onset = 1 - np.exp(-t / 0.003)
    variation = rng.standard_normal((len(STRIKES), 2, len(FRAME_RINGS), 1))
    for (s, steel, *_), (size, bend) in zip(STRIKES, variation):
        i = int(s * SR)
        decay = amplitude_ratio(steel + db + 3.0 * size - 60 * t / t60)
        modes = decay * np.sin(2 * np.pi * hz * (1 + 0.006 * bend) * t)
        out[i:i + len(t)] += np.sum(modes, axis=0) * onset
    return out[:N]


def strikes():
    s, steel, tick, shell = np.transpose(STRIKES)
    crack = pushes(s + 0.0004, steel + 15) + pushes(s + BOUNCE_S, steel + 4)
    loose = -34.5 + 0.75 * (steel + 22)
    scrape = [rattle(s - 0.005, steel + db, 0.074, 0.003, 3.1) for db in (-17, -16, -11, -15, -34)]
    slap = [rattle(s, steel - 0.6, 0.022, 0.00026, 3.0) + crack,
            rattle(s, steel - 1.5, 0.029, 0.0002, 3.6) + 1.2 * crack,
            rattle(s, steel + tick + 5, 0.026, 0.00036, 2.1),
            rattle(s, steel + shell + 4, 0.068, 0.0018, 3.0),
            pushes(s, steel + 11)]
    shake = [rattle(s, loose + 0.8, 0.16, 0.004, 6.0),
             rattle(s, loose - 4, 0.22, 0.003, 6.7),
             rattle(s, loose - 5, 0.14, 0.0028, 1.9),
             rattle(s, loose - 9, 0.22, 0.0026, 1.3),
             rattle(s, loose - 9, 0.35, 0.0038, 0.92)]
    return np.array(scrape) + np.array(slap) + np.array(shake)


def machine(steel, bars, tick, shell, desk):
    return (body(steel, STEEL_MODES, -3.5, 1800, 3800)
            + body(bars, BAR_MODES, 0.5, 3400, 6800)
            + body(tick, TICK_MODES, -7, 6800, 21000)
            + body(shell, SHELL_MODES, -3.1, 360, 1600)
            + body(desk, DESK_MODES, -18, 120, 440))


def scene():
    near = machine(*(strikes() + linkage())) + ratchet() + thumps() + brushes()
    rings = ringing() + frame() + base()
    return (near + rings + room(near + 0.55 * rings) + air())[None]


def band_limit(x):
    return signal.sosfilt(signal.butter(12, 16970, fs=SR, output="sos"), x)


def record(dry):
    quiet_hiss_db, loud_hiss_db, limit = -74.5, -64.5, 0.7
    held = sum((TIME >= a) & (TIME < b) for a, b in LOUD_RANGE)
    x = dry + coloured(SELF_NOISE, 0) * np.where(held, amplitude_ratio(loud_hiss_db), amplitude_ratio(quiet_hiss_db))
    x = limit * np.tanh(x / limit)
    hz, width, share = PORT_NOTCH
    x = x - share * signal.lfilter(*signal.iirpeak(hz, hz / width, SR), x)
    top_cut = signal.ellip(8, 0.3, 50, 15900, fs=SR, output="sos")
    bass_cut = signal.butter(2, 38, "highpass", fs=SR, output="sos")
    mix = signal.sosfilt(np.vstack([top_cut, bass_cut]), x)
    return band_limit(mix)


dry = scene()
out = record(dry)
generate_wav(out)
```